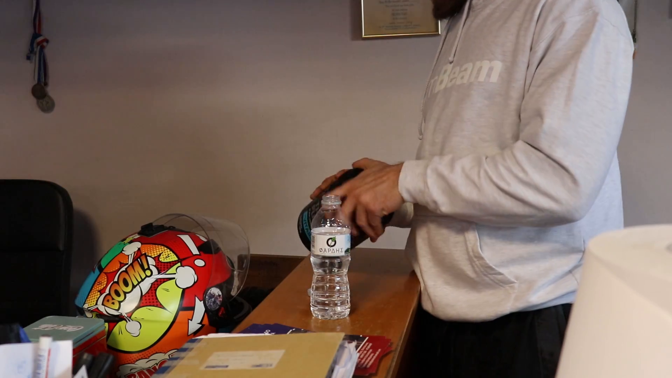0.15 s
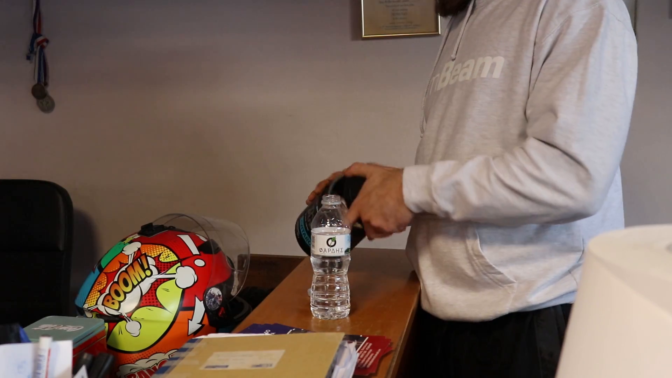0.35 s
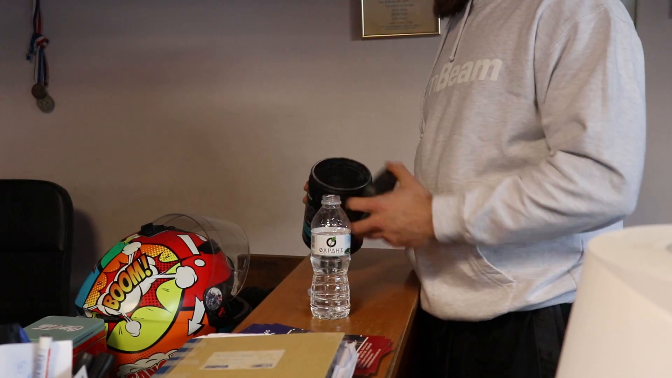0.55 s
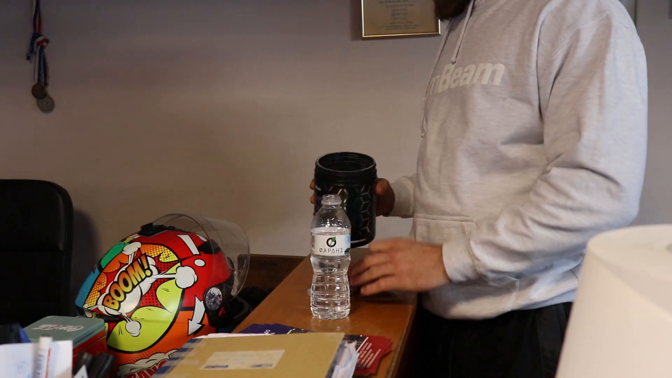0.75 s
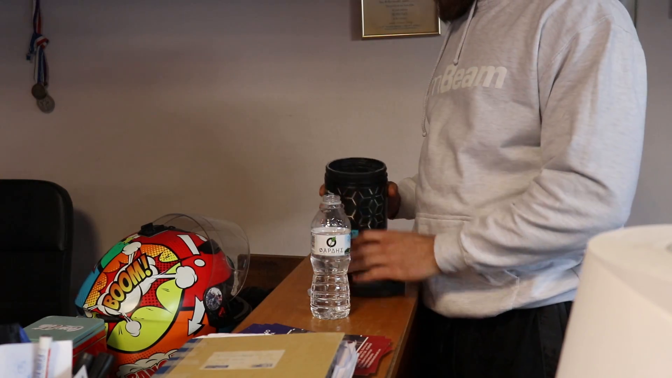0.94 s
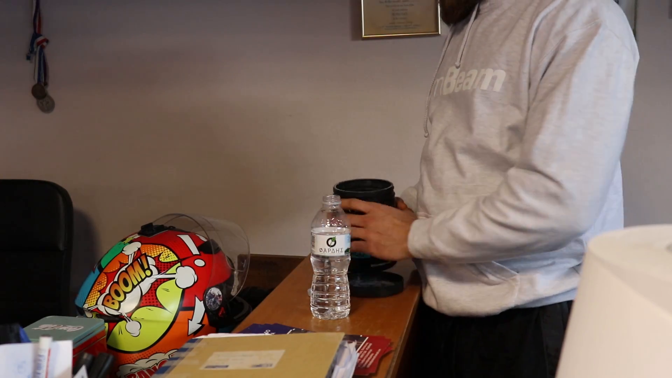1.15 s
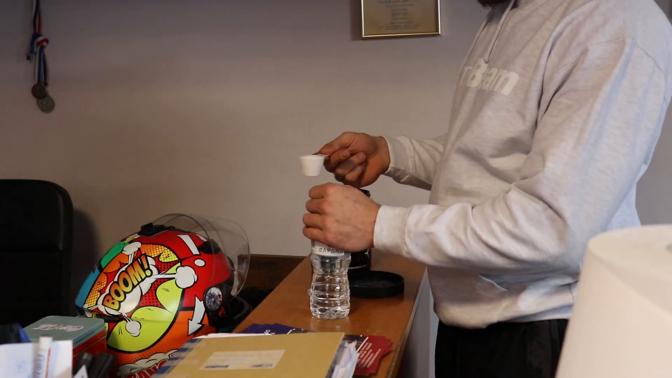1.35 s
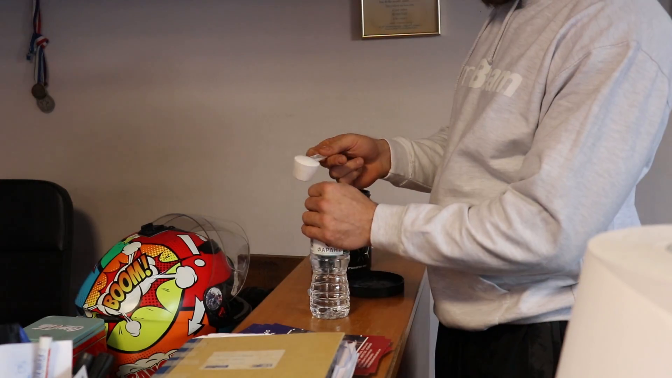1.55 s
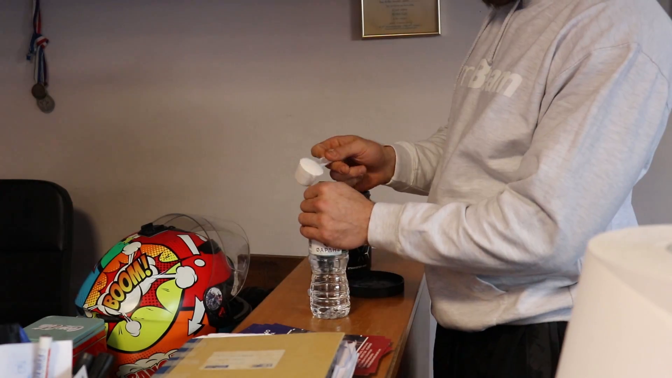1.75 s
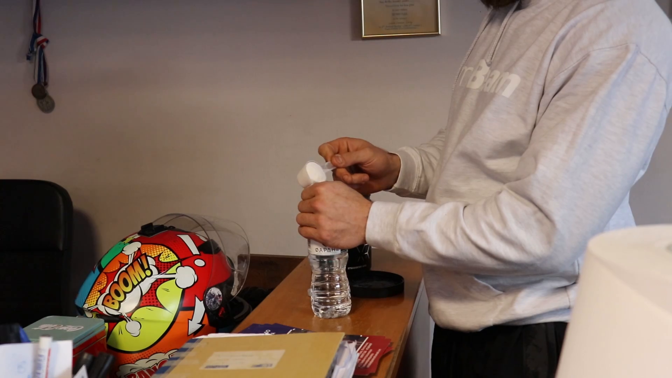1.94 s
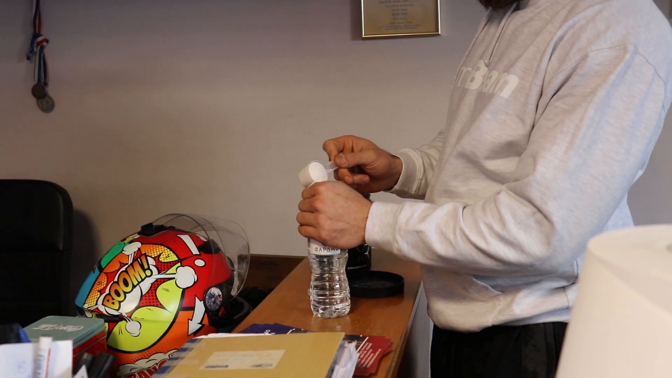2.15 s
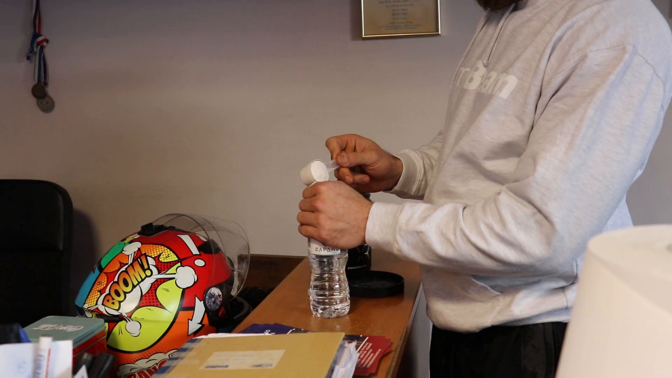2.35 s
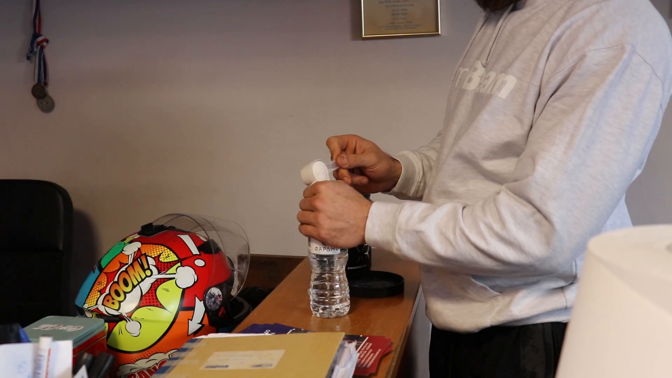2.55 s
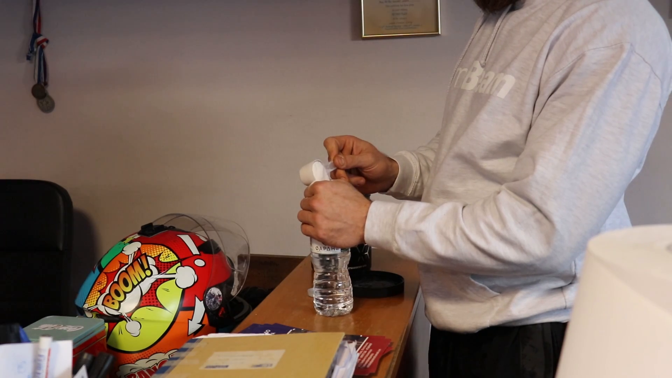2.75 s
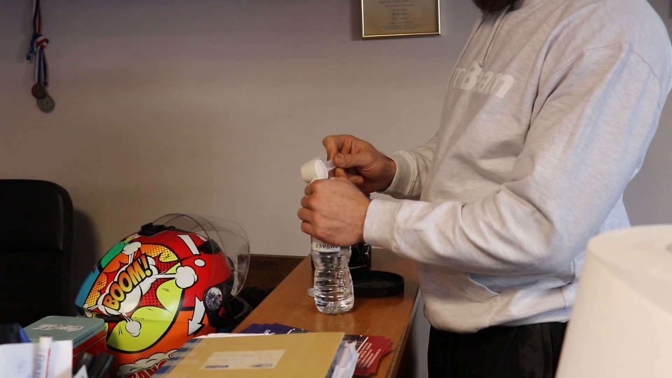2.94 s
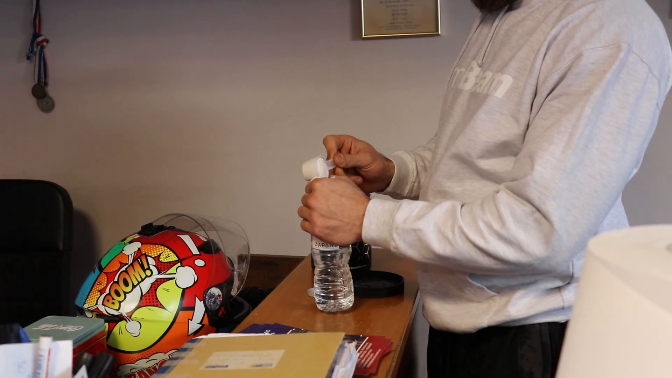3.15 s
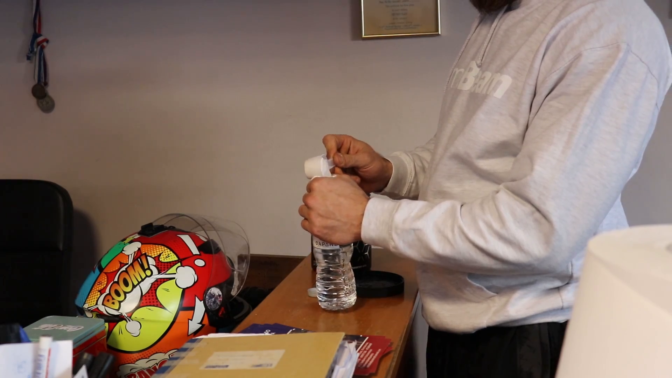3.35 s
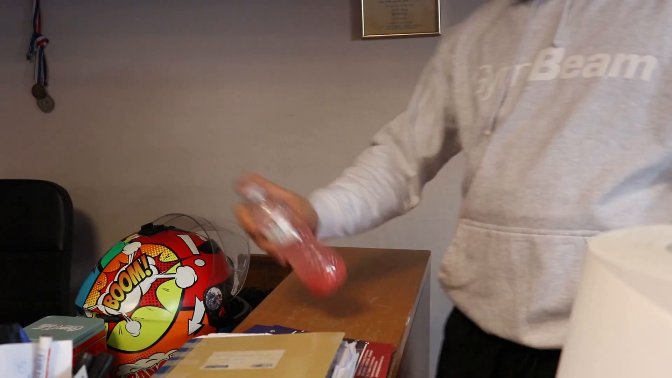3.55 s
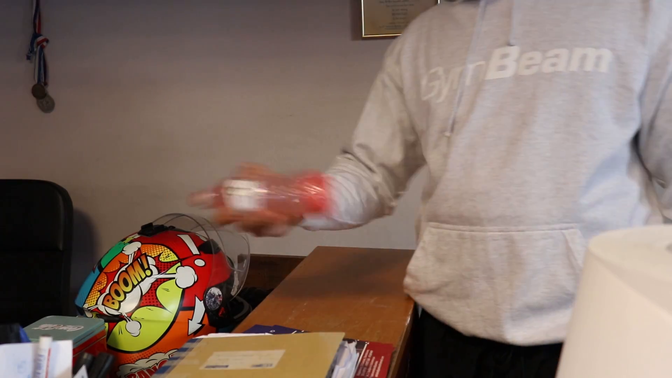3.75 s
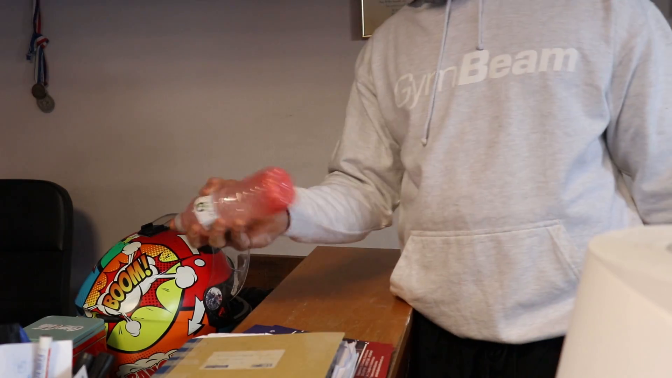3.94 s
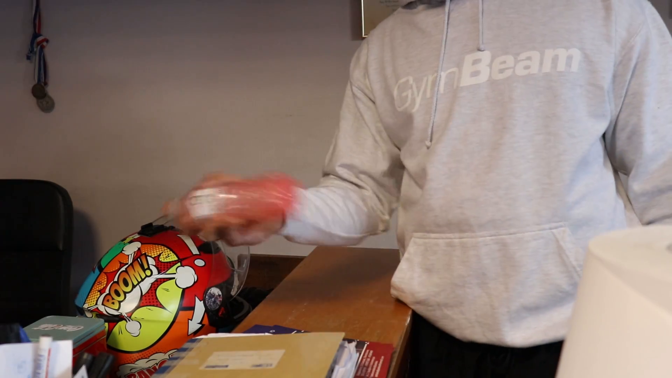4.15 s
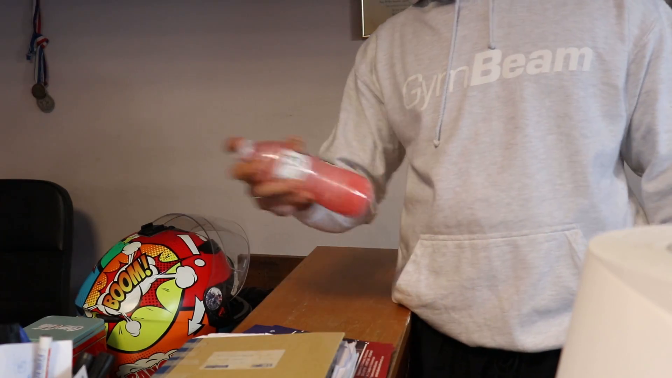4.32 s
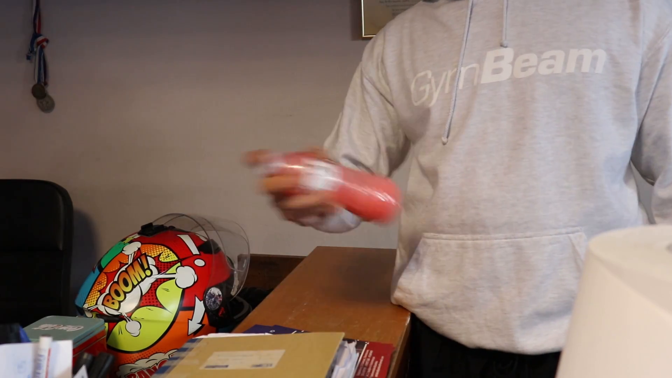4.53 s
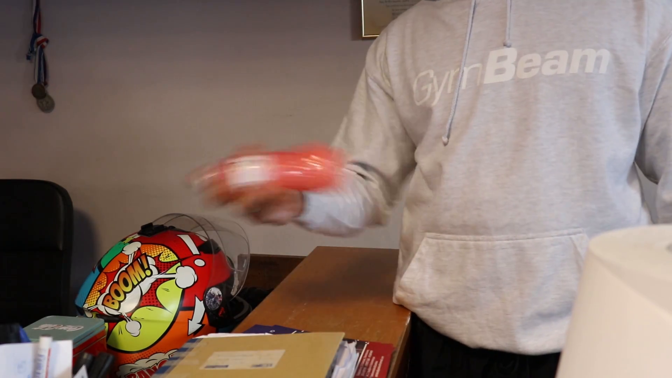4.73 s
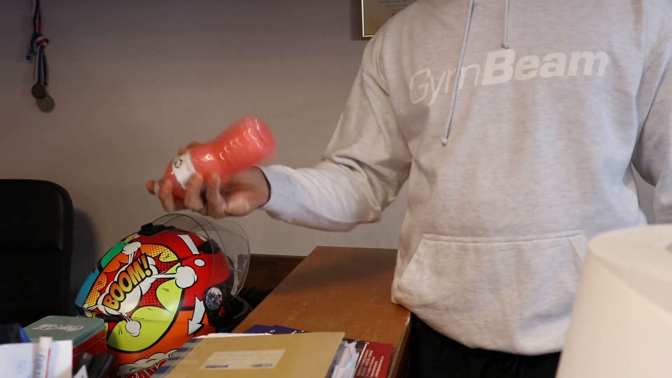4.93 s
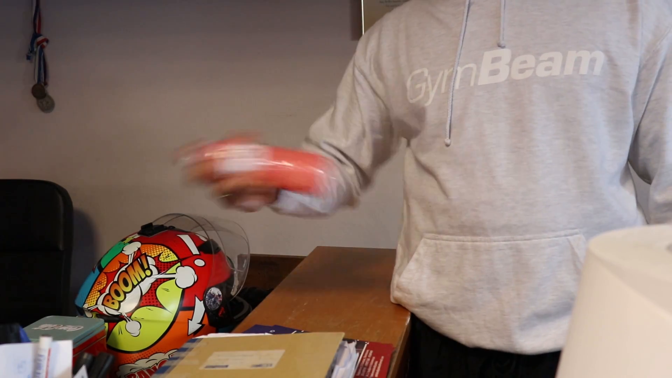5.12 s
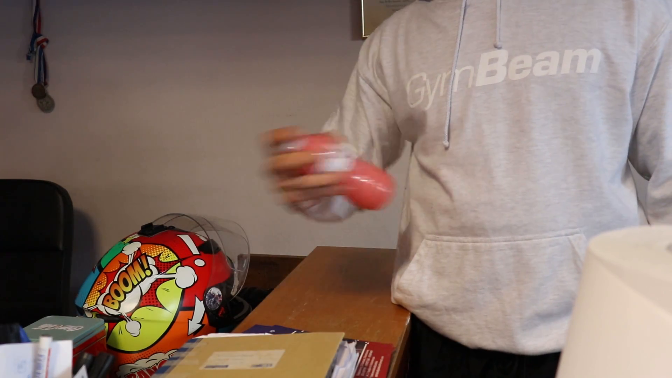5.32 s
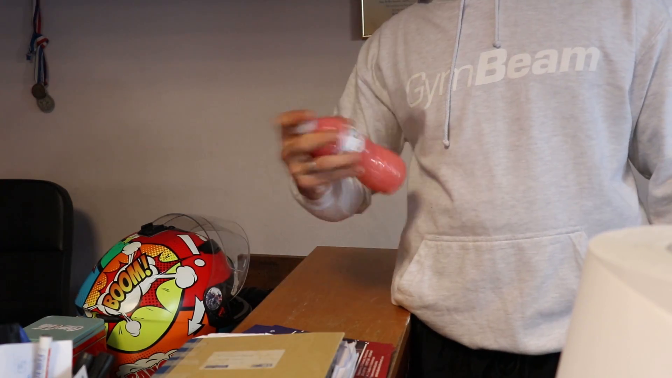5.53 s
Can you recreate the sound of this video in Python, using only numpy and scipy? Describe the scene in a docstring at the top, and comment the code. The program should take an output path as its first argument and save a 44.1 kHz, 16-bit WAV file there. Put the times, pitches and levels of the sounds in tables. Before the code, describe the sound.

Close in a small quiet room, a hollow plastic tub is slid and turned with dull desk bumps, then its lid gives a loud clack and a quick rattling cluster. The sound cuts to near silence with faint grainy powder. It cuts again to a thin bottle grabbed with crisp crackles and shaken fast, liquid slapping each end with bubbly gurgles and spray.

```python
"""A thin plastic bottle of drink is shaken end to end, the last of three moments at a desk in a small room.
After bright rustles as it is grabbed, the liquid slams into each end as a burst of bubbles (many short
rising tones) and hissing spray, while the wall crackles in the hand (millisecond snaps of noise). In the
first moment a plastic tub is turned over and its lid rattled: rough noise sets off ringing tones. In the
second, powder trickles from a scoop as grainy noise. Airy room noise and dull desk bumps lie under it."""
import sys
import numpy as np
from scipy import signal
from scipy.fft import rfft, irfft
from scipy.io import wavfile

SR = 44100
rng = np.random.default_rng(int(sys.argv[2]) if len(sys.argv) > 2 else 0)


def pcm_store(signal):
    """Save signal as 16-bit PCM."""
    levels = np.round(np.clip(np.atleast_2d(signal), -1, 1) * 32767)
    wavfile.write(sys.argv[1], SR, levels.astype(np.int16).T)


N = 246078
T = np.arange(N) / SR  # the time of every sample (s)

# When one moment gives way to the next: two times in seconds.
MOMENT_STARTS = (1.3155, 3.4335)

# Tone colour of the room's air, one list for the first and last moment, one for the second.
# Each row: frequency in Hz, strength in dB per Hz (only the shape counts).
AIR_COLOURS = [
    [(25, -9), (130, 0), (300, -3), (900, -10.5), (1500, -12.5), (5000, -14.5), (7000, -21), (16000, -24)],
    [(25, -23), (59, -8), (190, -12.5), (250, -9), (600, -18.5), (830, -9), (1050, -12), (1300, -19),
     (4000, -31.5), (8140, -38.5), (16000, -38)],
]
# Loudness of the air in each of the three moments, in dB.
AIR_LEVELS = [-48, -45.5, -46.5]
# A low distant drone. Each row: time in seconds, pitch in Hz, level in dB.
DRONE_PATH = [(1.32, 58.4, -54), (2.15, 53.86, -49), (3.149, 53.9, -53), (3.43, 50.8, -59)]
# A faint hum while the bottle is shaken. Each row: pitch in Hz, level in dB.
HUM_TONES = [(177.6, -52), (296.1, -49.5)]

# Powder pouring. Each row: time in seconds, level in dB.
TRICKLE_LEVEL = [(1.32, -58), (1.5, -52), (1.7, -56.5), (2, -74)]
# Its tone colour. Each row: frequency in Hz, strength in dB per Hz.
POWDER_COLOUR = [(3000, -2.5), (9900, -10), (12200, -6), (16000, -22)]

# Dull bumps through the desk. Each row: start in seconds, peak in dB, pitch in Hz.
DESK_BUMPS = [(0.1317, -26, 544), (.17, -33, 555), (.247, -29.5, 550), (0.269, -31, 300), (.31, -25, 260),
              (1.069, -43, 224), (1.216, -32.5, 234), (3.6, -32, 156)]

# Strokes of the hand and powder sliding on the tub. Each row: middle in seconds, level in dB,
# half length in seconds, hollow part in dB above that level.
STROKES = [(0.028, -34, 0.033, 1.5), (0.19, -44.5, 0.21, 4), (0.37, -33, 0.049, -8),
           (0.659, -42.5, 0.048, -6)]
STROKE_POWER = 1.6  # shape of the fall away from the middle of a stroke
# Tone colour of the sliding. Each row: frequency in Hz, strength in dB per Hz.
SLIDE_COLOUR = [(1000, -11), (1900, -0.5), (3400, 7.5), (5000, 3), (6200, -7.5), (12000, -9), (16000, -15)]
# Ringing of the tub's air and wall. Each row: pitch in Hz, width in Hz, strength in dB.
TUB_MODES = [(255, 90, -3.5), (386, 60, -5), (533, 70, -2), (668, 70, 8), (824, 79, -4)]

# Blows on tub and lid. Each row: start in seconds, peak of the body sound in dB, centre in Hz,
# contact time in seconds, hollow part in dB relative to the body.
BLOWS = [(.303, -10, 4700, 0.0078, 0), (0.309, -13, 3400, .008, 4), (0.842, 7, 1950, 0.0017, -16),
         (0.9163, -3.5, 4400, 0.0027, -33.5), (0.9223, -0.5, 3760, 0.00066, -45.5),
         (1.064, -1.5, 3300, 0.0065, -50), (1.0801, -3, 3400, 0.00077, -29),
         (1.179, -16.5, 2500, 0.0079, -28), (1.1858, -3, 2900, 0.0028, -38),
         (1.199, -6.5, 4120, 0.0044, -15), (1.214, 3.5, 4990, 0.001947, -10),
         (1.2255, -1, 5200, .0018, -20.5), (1.236, -9.5, 2440, 0.0056, -21),
         (1.264, -11, 4630, 0.0022, -29)]
# Ringing of the lid before each blow shifts it. Each row: pitch in Hz, width in Hz, strength in dB.
LID_MODES = [(1000, 99, -5), (1340, 70, 3), (1483, 110, 13.5), (1920, 150, -1), (2178, 200, 1),
             (2880, 150, 1), (3300, 163, -1.5), (3785, 114, 5.5), (4203, 86, 0.5), (4840, 120, -2),
             (5340, 174, 2)]
TREBLE_DB, TREBLE_DB_PER_OCTAVE = -14.5, 12.5  # treble of a blow centred on 3.5 kHz; higher blows have more
# Each blow lands on another spot and grip: spread of mode strengths (dB), of mode pitches (share).
SPOT_DB, GRIP_SHIFT = 2.5, 0.012
RATTLE_DB, RATTLE_S = -20, 0.0099  # loose chatter after each contact: level, decay time

# One faint tick during the powder, then loud snaps of the bottle wall.
# Each row: start in seconds, peak in dB, centre in Hz.
TICK_AND_SNAPS = [(2.4607, -29.5, 8550), (3.491, -27, 9000), (3.497, -21, 9000), (3.5014, -20, 7000),
                  (3.532, -16.5, 7000), (3.547, -13.5, 6500), (3.555, -18, 6500), (3.5644, -10.5, 6600),
                  (3.5654, -11.5, 6000), (3.578, -18, 6330), (3.61, -20, 8000), (3.6463, -20.5, 7540),
                  (3.668, -18, 11300), (3.673, -21.5, 11900), (3.678, -28, 5500), (3.7266, -23, 8400),
                  (3.7439, -20.5, 9850), (3.774, -14, 4000), (3.7945, -8.5, 6530), (3.813, -14, 4470),
                  (3.9015, -14, 7200), (3.9575, -18, 8500), (4.0242, -13, 9450), (4.041, -13, 8100),
                  (4.138, -14.5, 9500), (4.1827, -12, 5000), (4.1881, -13.5, 11200), (4.195, -9, 11700),
                  (4.242, -10.5, 8600), (4.2733, -19, 3800), (4.284, -14, 4200), (4.2912, -17, 6500),
                  (4.5202, -15.5, 9000), (4.53, -16.5, 3000), (4.7593, -11.5, 7000), (4.828, -20, 3500),
                  (5.0252, -12, 4130), (5.2826, -13, 3520), (5.5106, -13, 2900)]
# When small snaps may come: first and last time in seconds.
SMALL_SNAP_TIMES = (3.78, 5.0)
SMALL_SNAP_DB, SMALL_SNAP_HZ, SMALL_SNAP_COUNT = (-31, -25.5), (4997, 13500), 60
# Half width of a snap's band at -31.5 dB, and how much wider it gets for each dB louder.
SNAP_OCTAVES, SNAP_OCTAVES_PER_DB = 0.85, 0.02

# Single large bubbles. Each row: start in seconds, peak in dB, starting pitch in Hz.
BIG_BUBBLES = [(4.0475, -20, 2130), (4.073, -28, 804), (4.2935, -18.5, 2250), (4.44, -28.5, 828),
               (4.665, -29, 447), (4.782, -27.5, 640), (5.02, -27.5, 647), (5.13, -28, 856),
               (5.252, -30, 690), (5.279, -28.5, 960), (5.311, -26, 816)]

# Two bright rustles as the bottle is grabbed, then liquid landing in one end after the other.
# Each row: start in seconds, level in dB, length in seconds, brightness in dB.
RUSTLES_AND_LANDINGS = [(3.423, -42.5, 0.063, 12), (3.554, -38.5, 0.037, 11.5), (3.779, -28, 0.094, -8.5),
                        (3.853, -30.5, 0.15, -14), (3.904, -41.5, 0.059, 19), (3.979, -35.5, 0.032, 4),
                        (4.034, -30, 0.067, 1.5), (4.15, -31, 0.1, 1), (4.28, -32.5, 0.07, 1.5),
                        (4.378, -33, 0.11, -1), (4.508, -31.5, 0.09, 3), (4.615, -34, 0.13, 0),
                        (4.777, -27.5, 0.043, 3), (4.873, -34, 0.13, -3), (5.021, -29, 0.074, -2),
                        (5.11, -35, 0.073, -16), (5.187, -35.5, 0.075, 2.5), (5.272, -25.5, 0.055, 2),
                        (5.394, -39.5, 0.093, -2), (5.505, -30, 0.071, 5.5)]
RISE_S, FALL_POWER = 0.006, 3.1  # swell of each: rise time, abruptness of its end
# Liquid running along between landings. Each row: time in seconds, level in dB before the split into parts.
RUNNING_LIQUID = [(3.44, -50), (3.77, -66), (3.8, -53), (5.58, -34)]
# Gurgle swells until about 4.6 s, then thins again. Each row: time in seconds, dB relative to a landing's level.
GURGLE_OVER_TIME = [(3.5, -56), (3.8, -28), (4.05, -8), (4.6, -2), (5.5, -15.5)]
SPRAY_DB, GURGLE_PER_BRIGHT = -5, -0.51  # brightness lifts the spray and thins the gurgle (dB per dB)
# Tone colours of the small froth bubbles, the large gurgling bubbles and the spray.
# Each row: frequency in Hz, strength in dB per Hz.
FROTH_COLOUR = [(1000, -8.5), (1400, 1), (2000, 2.5), (2600, -5), (3500, -3), (4300, -9), (5400, -7.5),
                (6200, -17), (8000, -16.5)]
GURGLE_COLOUR = [(140, -8), (350, -6.5), (650, -2.5), (900, -0.5), (1300, -13)]
SPRAY_COLOUR = [(300, -22), (3000, -4.5), (5800, -1), (7600, -12), (10000, -6), (16000, -14)]

# How long the room's echoes last. Each row: frequency in Hz, seconds to fall by 60 dB.
ECHO_TIMES = [(300, 0.73), (3000, 0.492), (8000, 0.24), (16000, 0.15)]
TURNS_PER_S = 7.0  # how many times a second the three echo patterns take turns
EDGE_HZ = 15900  # highest frequency let through


def gain_of(db):
    """Turns decibels into a factor."""
    return 10 ** (np.asarray(db) / 20)


def evened(x):
    """Scales a sound to an average (rms) strength of 1."""
    return x / np.sqrt(np.mean(x ** 2) + 1e-20)


def peaked(x, db):
    """Scales the highest peak of a sound to db."""
    return gain_of(db) * x / (abs(x).max() + 1e-12)


def read(points, hz):
    """Looks up a value between the rows of a table, on a log-frequency axis."""
    f, value = np.transpose(points)
    return np.interp(np.log(hz + 1), np.log(f + 1), value)


def level(rows, column):
    """Follows a dB column over time as a factor; practically silent outside the rows."""
    rows = np.array(rows)
    return gain_of(np.interp(T, rows[:, 0], rows[:, column], -200, -200))


def add(mix, s, sound):
    """Mixes a sound in at s seconds."""
    part = mix[round(s * SR):][:len(sound)]
    part += sound[:len(part)]


def coloured(x, points):
    """Gives x a tone colour by scaling each frequency, then evens it to rms 1."""
    hz = np.fft.rfftfreq(len(x), 1 / SR)
    return evened(irfft(rfft(x) * gain_of(read(points, hz)), len(x)))


def gritty(per_s, spread_db):
    """Noise whose loudness heads for a new random value per_s times a second, as many small grains do."""
    sizes = np.minimum(rng.exponential(1, N // 4), 5)
    loudness = np.interp(T * per_s, np.arange(N // 4), sizes)
    return rng.standard_normal(N) * gain_of(spread_db * loudness)


def ringing(x, modes):
    """Lets x set off ringing tones (Hz, width Hz, dB); a wider one dies sooner."""
    out = np.zeros(len(x))
    for hz, width, db in modes:
        r = np.exp(-np.pi * width / SR)
        feedback = [1, -2 * r * np.cos(2 * np.pi * hz / SR), r * r]
        out += gain_of(db) * signal.lfilter([1 - r, 0, r - 1], feedback, x)
    return out


def bubbles(flow, points, per_s, cycles, spread_db, count):
    """Short rising tones at random times, made louder by flow; count pitches span the colour table."""
    out = np.zeros(N)
    for hz in np.geomspace(points[0][0], points[-1][0], count):
        u = np.arange(int(3 * cycles / hz * SR)) / SR * hz / cycles  # age in units of so many cycles
        tone = np.sin(2 * np.pi * cycles * (u + 0.088 * u * u))
        blip = tone * (1 - np.exp(-8.0 * u)) * np.exp(-2.2 * u)
        born, size = rng.random(N), rng.exponential(1, N)
        train = (born < per_s / count / SR) * gain_of(spread_db * np.minimum(size, 4))
        out += signal.oaconvolve(train, gain_of(read(points, hz)) * hz * blip)[:N]
    return flow * evened(out)


def hush():
    """Gently uneven air noise of the room, a low gliding drone and a hum that fades in."""
    moment = np.searchsorted(MOMENT_STARTS, T)
    colours = AIR_COLOURS + AIR_COLOURS[:1]  # the last moment has the colour of the first
    airs = [gain_of(db) * coloured(gritty(18.0, 0.79), colour) for colour, db in zip(colours, AIR_LEVELS)]

    s, hz, _ = np.transpose(DRONE_PATH)
    drone_turns = np.cumsum(np.interp(T, s, hz)) / SR
    drone = np.sqrt(2) * level(DRONE_PATH, 2) * np.sin(2 * np.pi * drone_turns)

    hum = np.zeros(N)
    for hz, db in HUM_TONES:
        hum += np.sqrt(2) * gain_of(db) * np.sin(2 * np.pi * (hz * T + rng.random()))
    hum_fade = np.clip((T - 3.9) / 0.82, 0, 1)
    return np.choose(moment, airs) + drone + hum * hum_fade


def trickle():
    """Falling powder: fast grainy noise that follows the pouring."""
    return level(TRICKLE_LEVEL, 1) * coloured(gritty(540.0, 1.1), POWDER_COLOUR)


def thuds():
    """Each bump is a low tone that swells and dies within about two soft cycles."""
    out, t = np.zeros(N), np.arange(2500) / SR
    for s, db, hz in DESK_BUMPS:
        bump = np.sin(2 * np.pi * hz * t) * hz * t * np.exp(-1.6 * hz * t)
        add(out, s, peaked(bump, db))
    return out


def handling():
    """Gritty sliding, part of it ringing in the hollow tub; each stroke swells and fades about its middle."""
    slide, hollow = np.zeros((2, N))
    for s, db, half_s, hollow_db in STROKES:
        stroke = gain_of(db) * np.exp(-abs((T - s) / half_s) ** STROKE_POWER)
        slide = np.hypot(slide, stroke)
        hollow = np.hypot(hollow, gain_of(hollow_db) * stroke)
    # the gripping hand damps the tub: wider modes, closer in strength
    held = [(hz, 3.0 * width, 0.5 * db) for hz, width, db in TUB_MODES]
    sliding = slide * coloured(gritty(460.0, 2.3), SLIDE_COLOUR)
    return sliding + hollow * evened(ringing(gritty(90.0, 3.0), held))


def knocks():
    """A short rough contact gives a dry crack, rings the lid near its centre pitch and the hollow tub."""
    out, t = np.zeros(N), np.arange(10000) / SR
    # the body of each blow is dull, with little above about 6 kHz
    dull = signal.butter(10, 5950, fs=SR, output="sos")
    bright = signal.butter(3, 6500, "high", fs=SR, output="sos")
    for s, db, hz, contact_s, hollow_db in BLOWS:
        u = t / contact_s
        contact = rng.standard_normal(len(t)) * (1 - np.exp(-2.5 * u)) * np.exp(-u)
        chatter_db = 3.0 * np.repeat(rng.standard_normal(len(t) // 50), 50)
        chatter = rng.standard_normal(len(t)) * gain_of(chatter_db)
        rattle = gain_of(RATTLE_DB) * chatter * np.minimum(u, 1) * np.exp(-t / RATTLE_S)
        # one firm push within the rough contact
        push = np.linalg.norm(contact) * (np.arange(len(t)) == round(0.5 * contact_s * SR))
        strike = contact + 0.58 * push + rattle

        near = []  # lid modes for this spot and grip, weaker away from the centre pitch
        for f, width, mode_db in LID_MODES:
            shift, spot = rng.standard_normal(2)
            near_db = mode_db + SPOT_DB * spot - 7.7 * np.log2(f / hz) ** 2
            near.append((f * (1 + GRIP_SHIFT * shift), width, near_db))
        lid = peaked(ringing(strike, near), 0.56)
        crack = peaked(ringing(strike, [(hz, 0.8 * hz, 0)]), -2.1)
        body = signal.sosfilt(dull, lid + crack)
        tub = ringing(push + 0.22 * strike, TUB_MODES)
        treble = signal.sosfilt(bright, contact * np.exp(-u))
        treble_db = TREBLE_DB + TREBLE_DB_PER_OCTAVE * np.log2(hz / 3500)
        add(out, s, peaked(body, db) + peaked(tub, db + hollow_db) + peaked(treble, db + treble_db))
    return out


def scattered(ranges, count):
    """Random event rows, each column drawn evenly within its range."""
    low, high = np.transpose(ranges)
    return list(low + (high - low) * rng.random((count, len(ranges))))


def crackles():
    """Each tick or snap is a millisecond or so of noise, in a band around its centre."""
    out, t = np.zeros(N), np.arange(300) / SR
    small_snaps = scattered([SMALL_SNAP_TIMES, SMALL_SNAP_DB, SMALL_SNAP_HZ], SMALL_SNAP_COUNT)
    for s, db, hz in list(TICK_AND_SNAPS) + small_snaps:
        snap = rng.standard_normal(len(t)) * (1 - np.exp(-t / 0.00005)) * np.exp(-t / 0.00081)
        half_octaves = SNAP_OCTAVES + SNAP_OCTAVES_PER_DB * (db + 31.5)
        edges = np.clip(hz * 2 ** (np.array([-1, 1]) * half_octaves), 500, 20000)
        band = signal.butter(2, edges, "band", fs=SR, output="sos")
        add(out, s, peaked(signal.sosfilt(band, snap), db))
    return out


def plops():
    """A large bubble rings for a few cycles, rising a little in pitch."""
    out, t = np.zeros(N), np.arange(2500) / SR
    for s, db, hz in BIG_BUBBLES:
        u = t * hz / 4.3  # age in units of 4.3 cycles
        plop = np.sin(2 * np.pi * hz * t * (1 + 0.027 * u)) * u * np.exp(-2 * u)
        add(out, s, peaked(plop, db))
    return out


def sloshing():
    """Each rustle or landing swells fast, holds and dies; froth, gurgle and spray follow by their own amounts."""
    # four parts: coarse froth, fine froth, gurgle, spray
    running_db = [[-3.0], [-3.0], [-5.0], [-11.0]]
    power = (level(RUNNING_LIQUID, 1) * gain_of(running_db)) ** 2
    for s, db, length_s, bright_db in RUSTLES_AND_LANDINGS:
        t = np.maximum(T - s, 0)
        swell = (1 - np.exp(-t / RISE_S)) * np.exp(-(t / length_s) ** FALL_POWER)
        gurgle_db = np.interp(s, *np.transpose(GURGLE_OVER_TIME)) + GURGLE_PER_BRIGHT * bright_db
        spray_db = SPRAY_DB + bright_db
        # coarse froth goes with gurgle, fine froth with spray
        parts_db = np.array([[0.5 * gurgle_db], [0.26 * spray_db], [gurgle_db], [spray_db]])
        power += (swell * gain_of(db + parts_db)) ** 2
    coarse, fine, gurgle, spray = np.sqrt(power)
    froth = bubbles(coarse, FROTH_COLOUR[:4], per_s=800.0, cycles=4.36, spread_db=3.6, count=20)
    froth += bubbles(fine, FROTH_COLOUR[3:], per_s=1600.0, cycles=6.2, spread_db=2.63, count=24)
    gurgling = bubbles(gurgle, GURGLE_COLOUR, per_s=900.0, cycles=4.7, spread_db=1.9, count=28)
    return froth + gurgling + spray * coloured(gritty(700.0, 3.85), SPRAY_COLOUR)


def room(x):
    """Sparse echoes of random sign, each band dying at its own speed; three patterns take turns."""
    out = np.zeros(N)
    for k in range(3):
        taps = np.zeros(SR // 2)
        at = np.arange(160, len(taps) - 20, 20)
        taps[at + rng.integers(0, 20, len(at))] = rng.choice([-1.0, 1.0], len(at))
        hz, t, bands = signal.stft(taps, SR, nperseg=256)
        fading = gain_of(-60 * t / read(ECHO_TIMES, hz)[:, None])
        tail = signal.istft(bands * fading, SR, nperseg=256)[1]
        turn = np.sqrt(2 / 3) * np.cos(2 * np.pi * (TURNS_PER_S * T + k / 3))
        out += signal.fftconvolve(turn * x, tail / np.linalg.norm(tail))[:N]
    return out


def scene():
    """The tub falls silent as the second moment starts; sloshing waits for the third; both share a room."""
    blows = knocks()
    tub = (handling() + blows + gain_of(-12.0) * room(blows)) * (T < MOMENT_STARTS[0])
    bottle = crackles() + plops() + sloshing() * (T > MOMENT_STARTS[1])
    bottle_in_room = bottle + gain_of(-10.5) * room(bottle)
    return (hush() + trickle() + thuds() + tub + bottle_in_room)[None]


def record(dry):
    """Flattens the loudest peaks at full scale, then removes the highest frequencies."""
    clipped = np.clip(dry, -1, 1)
    low_pass = signal.firwin(401, EDGE_HZ, window=("kaiser", 7), fs=SR)
    return signal.oaconvolve(clipped, low_pass[None], "same")


dry = scene()
out = record(dry)
pcm_store(out)
```